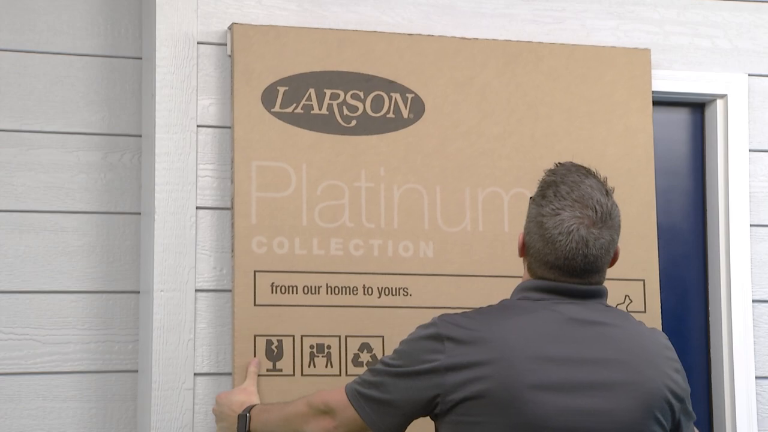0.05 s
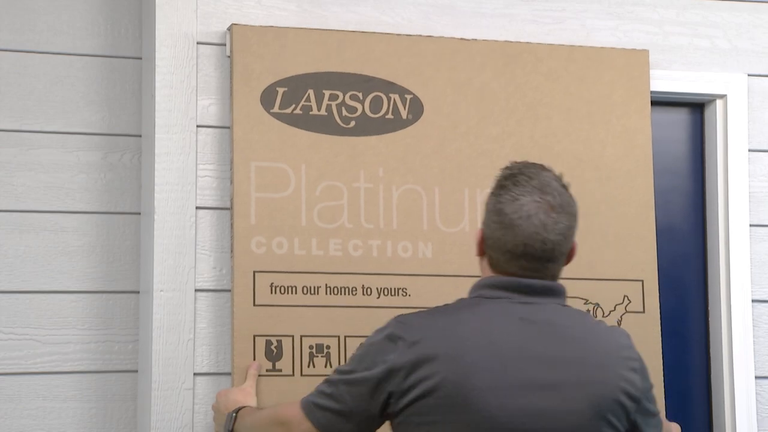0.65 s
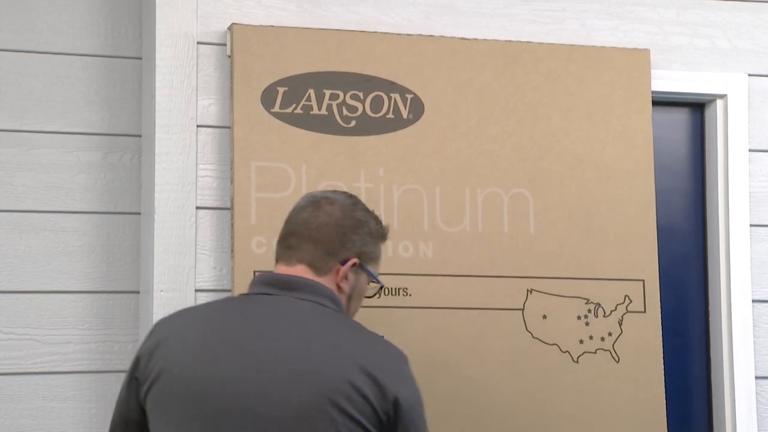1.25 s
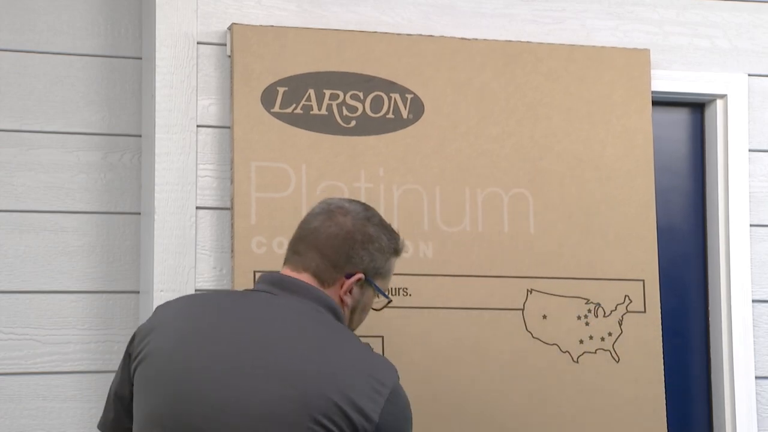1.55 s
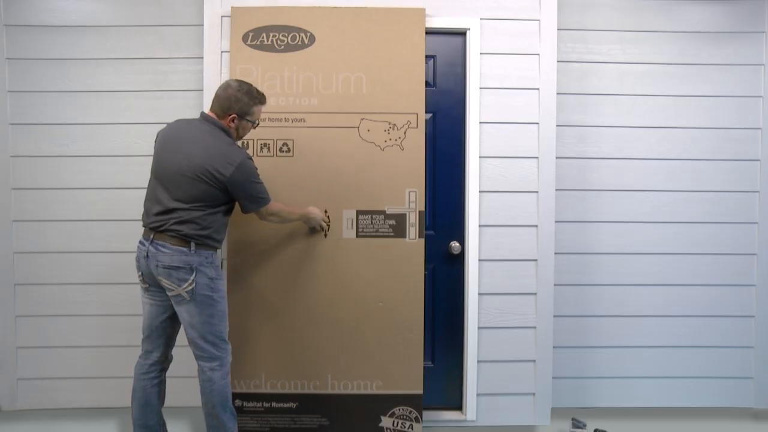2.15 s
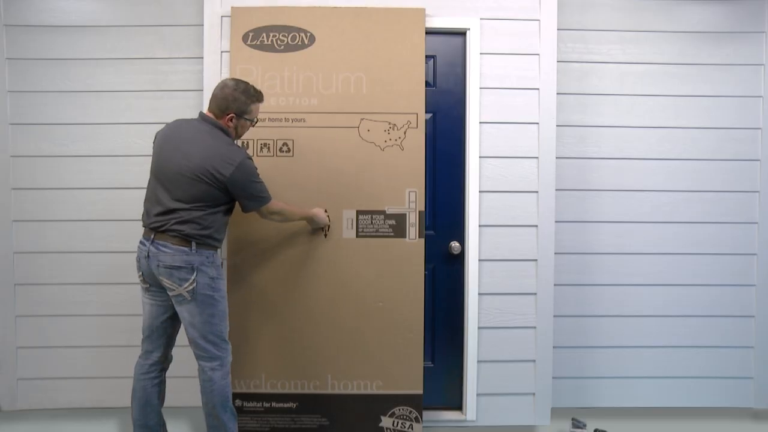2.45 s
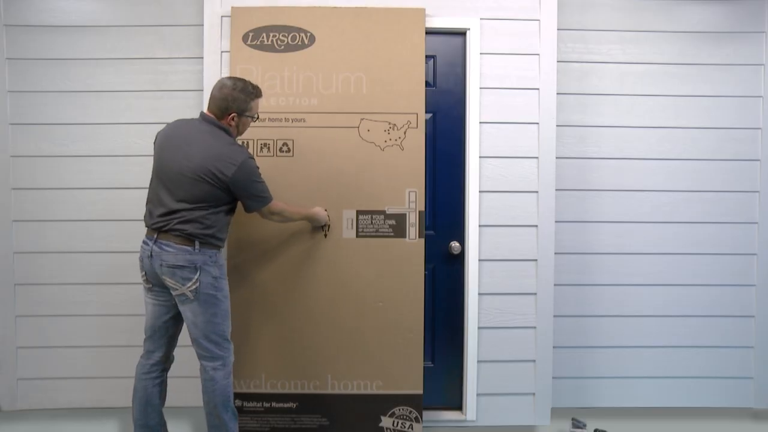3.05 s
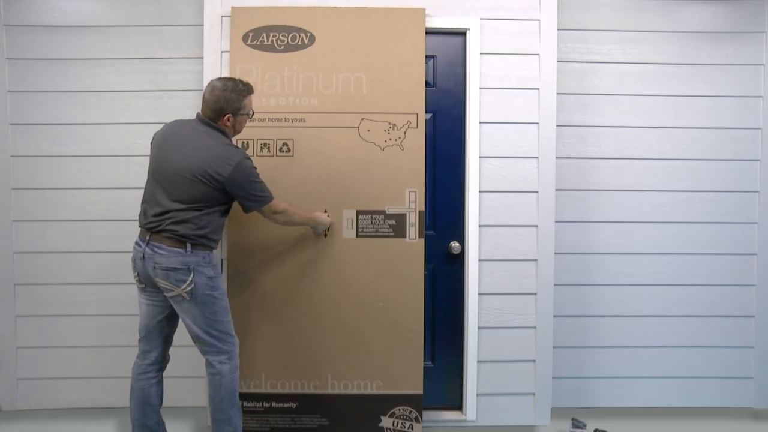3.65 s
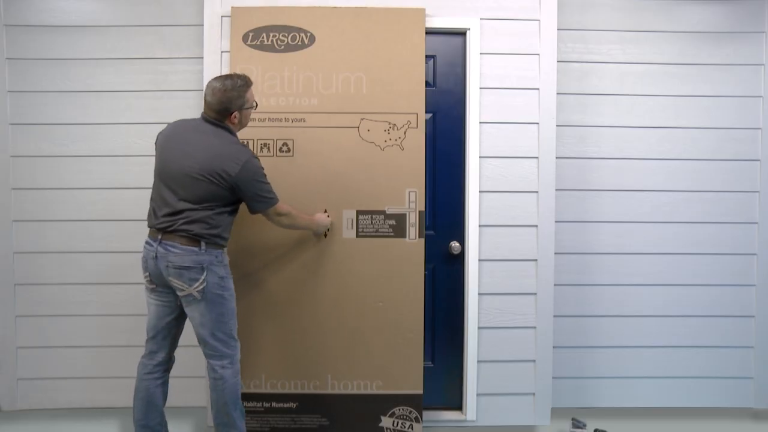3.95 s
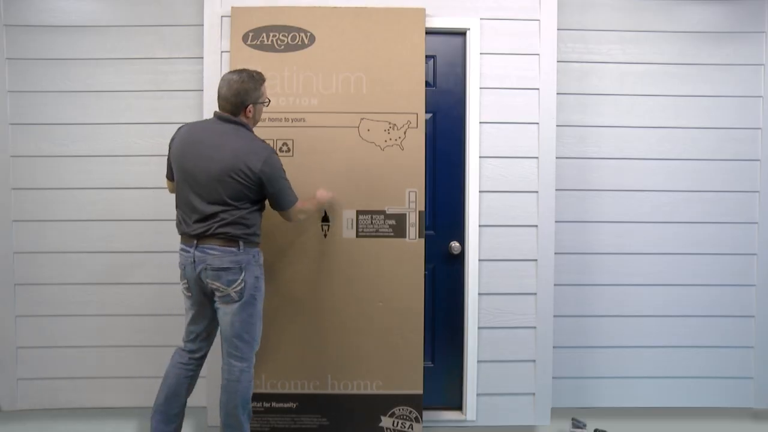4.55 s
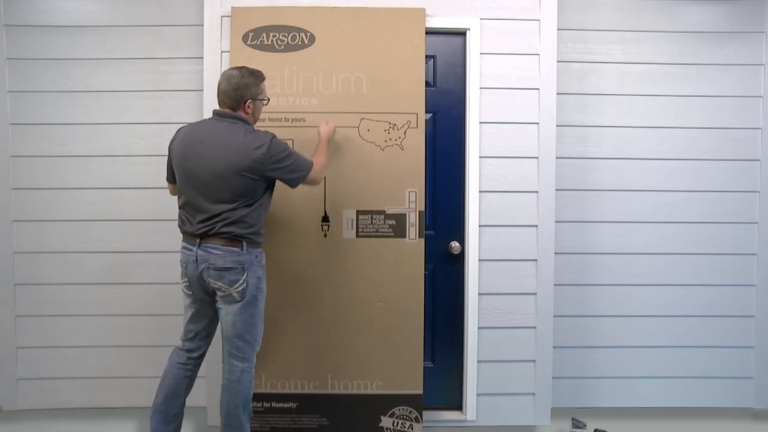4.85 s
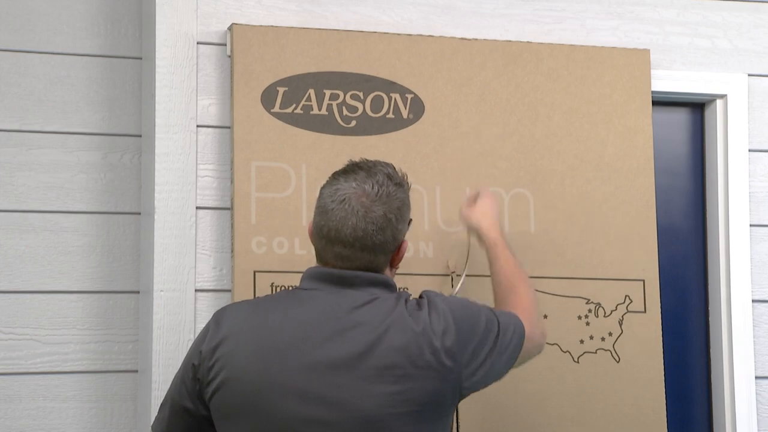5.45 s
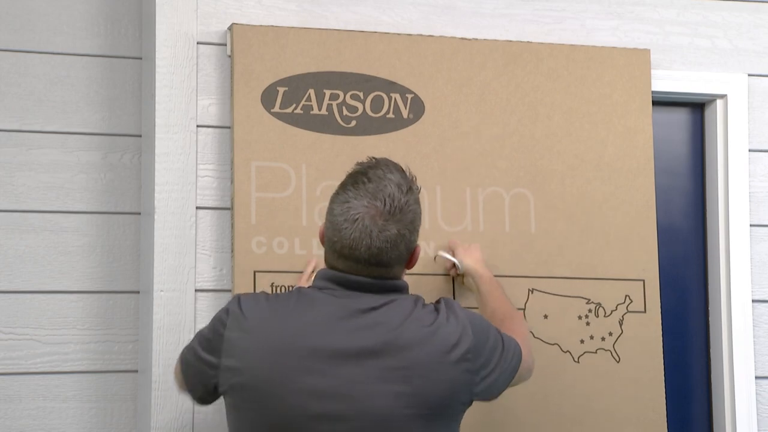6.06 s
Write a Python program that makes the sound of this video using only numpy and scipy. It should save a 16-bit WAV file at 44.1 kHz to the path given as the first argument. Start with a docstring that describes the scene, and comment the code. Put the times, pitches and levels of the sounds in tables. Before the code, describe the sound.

On a quiet porch, a large cardboard box is handled lightly while a brief gust bumps the microphone. A knife pokes through the cardboard in clusters of dry snaps, with small rubs and hollow knocks that echo briefly off the walls. One loud, short rip follows as the blade chops through the ridges, rasping and booming. Sleeves swish faintly, and a last sharp stab ends it.

```python
"""A knife rips up through a tall cardboard box, chopping across the flutes as the big panel booms.
Before the rip it is worked in with sharp snaps, dry pops and hollow knocks; the porch walls answer.
Sleeves rustle, a puff of wind bumps the microphone, and at the end the blade bites in again."""
import sys
import numpy as np
from scipy import signal
from scipy.fft import rfft, irfft, next_fast_len
from scipy.io import wavfile
from scipy.ndimage import map_coordinates

SR = 44100
rng = np.random.default_rng(int(sys.argv[2]) if len(sys.argv) > 2 else 0)


def transcribe(u):
    """Save the signal u as a 16-bit wav file named by the first command-line argument.

    u: samples, shape (n,) or (channels, n), limited to [-1, 1]; the rate is SR.
    q: integer samples, one column per channel.
    """
    v = np.clip(np.atleast_2d(u).T, -1, 1)
    q = np.round(v * 32767).astype(np.int16)
    wavfile.write(sys.argv[1], SR, q)


N = 277830
T = np.arange(N) / SR
CUT_START_S, CUT_FULL_S, CUT_END_S = 4.338, 4.415, 5.1606

# broad crack of cardboard: f/Hz, level/dB
CRACK_SPECTRUM = [(100, -14), (290, 2.5), (600, -0.5), (1200, 1), (2100, 0), (4000, -4), (7000, -7),
                  (12500, -4.5), (16000, -23)]
# rasp of the torn edge, lower as the slit opens: t/s, f/Hz, level/dB
EDGE_RASP = [(4.39, 9700, -7), (4.47, 6550, -1), (4.55, 5660, 1.5), (4.65, 4800, 1.5), (4.71, 4860, -9),
             (4.8, 5430, 5), (4.92, 4970, 1), (5.15, 4600, -7)]


def amp(db):
    """Decibels to gain."""
    return 10 ** (np.asarray(db) / 20)


def unit(x):
    """Scale to rms 1."""
    return x / np.sqrt(np.mean(x ** 2) + 1e-20)


def along(points, hz):
    """Read (f/Hz, value) points on a log axis."""
    f, v = np.transpose(points)
    return np.interp(np.log(hz + 1), np.log(f), v)


def course(rows):
    """Pitch and gain per sample from (t/s, f/Hz, level/dB) rows."""
    s, hz, db = np.transpose(rows)
    return np.interp(T, s, hz), amp(np.interp(T, s, db))


def gate(start_s, end_s, attack_s, release_s):
    """1 from start to end, with exponential flanks."""
    return np.exp(-np.maximum(0, np.maximum((start_s - T) / attack_s, (T - end_s) / release_s)))


def bell(t, sigma_s):
    """Gaussian, 1 at t = 0."""
    return np.exp(-(t / sigma_s) ** 2 / 2)


def wobble(rate_hz):
    """Smooth random curve through knots at rate_hz."""
    knots = rng.standard_normal(int(N * rate_hz / SR) + 4)
    return map_coordinates(knots, [T * rate_hz])


def grains(rate_hz, spread_db):
    """Tiny random clicks of unequal size, rms 1."""
    clicks = (rng.random(N) < rate_hz / SR) * rng.choice([-1, 1], N)
    return unit(clicks * amp(spread_db * np.clip(rng.standard_normal(N), -2, 2)))


def add(track, s, sound):
    """Mix a sound in at time s."""
    part = track[round(s * SR):][:len(sound)]
    part += sound[:len(part)]


def filtered(x, response):
    """Apply a frequency response."""
    size = next_fast_len(len(x) + SR // 10, real=True)
    return irfft(rfft(x, size) * response(np.fft.rfftfreq(size, 1 / SR)), size)[:len(x)]


def highpass(x, edge_hz, order):
    """Zero-phase bass cut, -6 dB at the edge."""
    return filtered(x, lambda hz: hz ** order / (hz ** order + edge_hz ** order))


def coloured(x, spectrum):
    """Shape by (f/Hz, level/dB) points, rms 1."""
    return unit(filtered(x, lambda hz: amp(along(spectrum, hz))))


def resonate(x, modes):
    """Resonances (f/Hz, width/Hz, level/dB) of alternating sign, rms 1."""
    def response(f):
        return sum((-1) ** k * amp(db) * 1j * f * width / (hz * hz - f * f + 1j * f * width)
                   for k, (hz, width, db) in enumerate(modes))
    return unit(filtered(x, response))


def glide(x, hz, width_hz):
    """One resonance of moving pitch, rms 1."""
    turn = np.exp(2j * np.pi * np.cumsum(hz) / SR)
    ring = signal.lfilter([1], [1, -np.exp(-np.pi * width_hz / SR)], x / turn)
    return unit((ring * turn).real)


def burst(hz, width_hz, t60_s, crack_db, rise_s=0.00018):
    """Damped resonance plus the broad crack of cardboard, peak near 1."""
    t = np.arange(SR // 10) / SR
    decay = np.exp(-np.log(1000) * t / max(t60_s, 0.002)) * (1 - np.exp(-t / rise_s))
    ring_noise, crack_noise = rng.standard_normal((2, len(t)))
    ring = resonate(ring_noise * decay, [(hz, width_hz, 0)])
    crack = amp(crack_db) * unit(decay * coloured(crack_noise, CRACK_SPECTRUM))
    return unit(ring + crack) * np.sqrt(np.mean(decay ** 2)) / decay.max() / 2


def porch(x, tail_db, early_db, early_t60_s):
    """Add dull early reflections off box and wall, and a tail whose treble dies first."""
    # porch decay: f/Hz, t60/s
    decay_times = [(150, 0.83), (400, 0.74), (1040, 0.75), (2760, 0.56), (7280, 0.43), (15000, 0.26)]
    hz, t, bands = signal.stft(rng.standard_normal(SR), SR, nperseg=256)
    bands = bands * np.exp(-np.log(1000) * t / along(decay_times, hz)[:, None])
    tail = signal.istft(bands, SR, nperseg=256)[1]
    age = np.arange(len(tail)) / SR
    early = rng.standard_normal(len(tail)) * np.exp(-np.log(1000) * age / early_t60_s) * (age > 0.002)
    early = filtered(early / np.linalg.norm(early), lambda hz: 1 / (1 + 1j * hz / 9000))
    answer = amp(tail_db) * tail / np.linalg.norm(tail) + amp(early_db) * early
    return x + signal.fftconvolve(x, answer)[:len(x)]


def background():
    """Quiet steady noise, mostly bass."""
    # ambience: f/Hz, level/dB
    spectrum = [(15, -27), (25, 3.5), (92, -7), (153, 1.5), (344, -8.5), (591, -8.5), (1000, -11),
                (3080, -17), (9070, -21), (15300, -25), (16000, -34)]
    return amp(-63.5) * coloured(rng.standard_normal(N), spectrum)


def wind():
    """One puff buffets the microphone; each eddy is a suck and a push on the diaphragm."""
    # buffeting: f/Hz, level/dB
    spectrum = [(12, -38), (20, -3), (43, 12.5), (81, -1.5), (145, -16), (352, -32), (500, -52), (650, -66),
                (1100, -120)]
    # single eddies: t/s, peak/dB, f/Hz
    eddies = [(0.499, -39, 63), (0.639, -41, 73), (0.768, -31.5, 119), (0.792, -29.5, 72.5),
              (0.837, -32, 111), (0.901, -18.5, 79), (1.013, -37.5, 86), (1.395, -39, 80),
              (1.779, -41.5, 58.7)]
    peak_s, rise_db_per_s, fall_db_per_s = 0.81, 25, 21
    swell_db = -36.5 - np.maximum(rise_db_per_s * (peak_s - T), fall_db_per_s * (T - peak_s))
    lull_db = -11 * bell(T - 1.236, sigma_s=0.033)
    gust = amp(swell_db + lull_db) * gate(0.41, 1.68, attack_s=0.015, release_s=0.12)
    out = gust * unit(amp(4.3 * wobble(23.04)) * coloured(rng.standard_normal(N), spectrum))
    for s, db, hz in eddies:
        phase = 2 * np.pi * hz * (T - s)
        out += amp(db) * phase * np.exp((1 - phase ** 2) / 2)
    return out


def sleeves():
    """Sleeves and knife cord on the liner: some strokes full brushes, others a thin high swish."""
    # strokes: peak t/s, level/dB, sigma/s, lower edge/Hz
    strokes = [(0.059, -53.5, 0.016, 815), (0.119, -61.5, 0.043, 885), (0.388, -58.5, 0.017, 600),
               (0.726, -57.5, 0.07, 2780), (0.899, -60.5, 0.025, 900), (5.39, -51.5, 0.022, 6740),
               (5.529, -53, 0.052, 4430), (5.921, -59.5, 0.13, 1512), (6.222, -45, 0.073, 2210)]
    # sliding threads: f/Hz, level/dB
    spectrum = [(200, 30), (900, 19), (2500, 9.5), (6000, 4.5), (12000, 5), (16000, -8.5)]
    out, t = np.zeros(N), np.arange(SR // 2) / SR - 1 / 4
    for s, db, sigma_s, edge_hz in strokes:
        threads = coloured(grains(rate_hz=12000, spread_db=7)[:len(t)], spectrum)
        stroke = unit(highpass(threads, edge_hz, order=2)) * bell(t, sigma_s)
        start_s = s + t[0]
        add(out, max(start_s, 0), amp(db) * stroke[max(0, round(-start_s * SR)):])
    return out


def pops():
    """Single flutes buckle under the hand: a faint click and a short, dull knock."""
    # buckling flutes: t/s, level/dB, f/Hz
    buckles = [(1.616, -46, 1040), (2.572, -36, 990), (2.808, -41, 755), (3.668, -46, 1030),
               (3.708, -40.5, 634), (3.767, -45.5, 1040), (3.823, -47, 1070), (4.132, -46, 610),
               (4.175, -48, 590), (5.7506, -40.5, 720)]
    out = np.zeros(N)
    for s, db, hz in buckles:
        spot = burst(hz, width_hz=0.14 * hz, t60_s=0.0092, crack_db=-6, rise_s=0.0015)
        box = amp(-1.5) * burst(990, width_hz=150, t60_s=0.022, crack_db=-9, rise_s=0.0017)
        add(out, s, amp(db - 4) * (spot + box))
    return porch(out, tail_db=-7, early_db=-9, early_t60_s=0.07)


def handling():
    """A short squeak and dull knocks on the box, some ringing all of it; knife and cord tick."""
    # a squeak, then knocks: t/s, level/dB, f/Hz, t60/s, box re spot/dB
    contacts = [(0.275, -38, 1200, 0.056, -32), (0.822, -37.5, 456, 0.16, -30), (1.334, -36, 560, 0.17, 1),
                (4.221, -34, 480, 0.049, -6)]
    # damping by the soft hand: f/Hz, level/dB
    soft_hand = [(1300, -1.5), (1800, -4.5)]
    # knife and cord ticks: t/s, level/dB, f/Hz
    taps = [(0.101, -39.5, 2820), (0.278, -41, 11800), (0.36, -39.5, 6500), (0.8253, -41, 2820),
            (2.8606, -40.5, 2900), (5.6378, -39.5, 8500), (6.038, -35, 11500), (6.047, -40, 11000)]
    board, ticks = np.zeros((2, N))
    for s, db, hz, t60_s, box_db in contacts:
        spot = burst(hz, width_hz=0.19 * hz, t60_s=t60_s, crack_db=-14, rise_s=0.003)
        box = amp(box_db) * burst(920, width_hz=210, t60_s=0.33 * t60_s, crack_db=-30)
        add(board, s, amp(db - 2.5) * (spot + box))
    board = filtered(board, lambda hz: amp(along(soft_hand, hz)))
    for s, db, hz in taps:
        add(ticks, s, amp(db - 6) * burst(hz, width_hz=0.46 * hz, t60_s=0.027, crack_db=-3.5))
    return porch(board + ticks, tail_db=-8.5, early_db=-7, early_t60_s=0.1)


def rubs():
    """The blade rubs in its slot and sets the board around it humming."""
    # blade strokes: t/s, level/dB, length/s
    strokes = [(2.31, -43, 0.0098), (2.448, -44.5, 0.0064), (2.561, -49, 0.019), (2.805, -54.5, 0.079),
               (3.035, -45, 0.015), (4.207, -43, 0.017), (4.314, -32, 0.0081), (6.112, -53, 0.014)]
    scrape = coloured(grains(rate_hz=5100, spread_db=-2), CRACK_SPECTRUM)
    hum = amp(-7) * resonate(grains(rate_hz=2500, spread_db=1), [(690, 200, -1), (1067, 78, -1)])
    contact = sum(amp(db) * gate(s, s + length_s, attack_s=0.0046, release_s=0.016)
                  for s, db, length_s in strokes)
    return amp(-5.5) * porch(contact * (scrape + hum), tail_db=-1, early_db=-15, early_t60_s=0.29)


def bites():
    """The blade bites in again: a thunk and a tear."""
    # blade entries: t/s, level/dB, t60/s
    entries = [(6.281, -30.5, 0.24), (6.2953, -10, 0.02)]
    out = np.zeros(N)
    for s, db, t60_s in entries:
        thunk = amp(-0.5) * burst(1020, width_hz=67, t60_s=t60_s, crack_db=-7)
        tear = burst(2660, width_hz=3300, t60_s=t60_s, crack_db=-8)
        add(out, s, amp(db) * (thunk + tear))
    return out


def blade_ping():
    """The steel blade springs free and rings briefly."""
    # blade modes: f/Hz, level/dB, t60/s
    modes = [(1880, 1, 0.023), (4120, -0.5, 0.022), (4420, -1, .021)]
    t = np.arange(SR // 10) / SR
    return sum(amp(db - 60 * t / t60_s) * np.sin(2 * np.pi * hz * t) for hz, db, t60_s in modes) / 2


def snaps():
    """The point punches the liner: it gives, the board thuds, the toughest fibres click."""
    # liner cracks: t/s, level/dB, f/Hz, click/dB, rise/s, ping/dB
    cracks = [(1.8352, -29.5, 6760, -22, 0.00073, -16), (1.882, -24, 1260, 6, 0.0021, -22),
              (1.8974, -21.5, 1280, 5.5, 0.00014, -30), (1.916, -30, 1400, 7, 0.0023, -27),
              (2.2714, -27, 3200, 1, 0.0012, 1), (2.316, -35.5, 1870, -13, .0005, -7),
              (2.4119, -38, 1910, -23, 0.00045, -11), (2.625, -35, 1320, -5, 0.00077, -26),
              (2.9813, -29.5, 2160, -21, 0.00026, -0.5), (2.9851, -29.5, 3500, 18.5, .0002, -21),
              (2.9876, -29, 1990, 16, 0.00029, -2), (2.9919, -24.5, 1910, 1, 0.00049, -2),
              (3.0482, -24.5, 2600, 10, 0.00019, -4), (4.2258, -26.5, 7300, 7, 0.0015, -30),
              (4.314, -27.5, 5200, 4, 0.0046, -24)]
    out = np.zeros(N)
    for s, db, hz, click_db, rise_s, ping_db in cracks:
        give = burst(hz, width_hz=hz / 2, t60_s=0.018, crack_db=-3, rise_s=rise_s)
        thud = amp(-13.5) * burst(580, width_hz=290, t60_s=0.028, crack_db=-27, rise_s=0.001)
        click = amp(click_db) * burst(10000, width_hz=4500, t60_s=0.0039, crack_db=-3, rise_s=0.0001)
        snap = np.pad(give + thud + click, (0, SR // 2))
        add(out, s, amp(db - 4.5) * porch(snap, tail_db=-3.5, early_db=-0.5, early_t60_s=0.19))
        add(out, s, amp(db + ping_db - 3) * blade_ping())  # close and dry
    return highpass(out, 170, order=3)  # so small a spot radiates no bass


def pull():
    """Gain of the arm's pull: builds, holds, stops as the blade runs out."""
    attack_db = 8.5 * np.maximum(0, (CUT_FULL_S - T) / (CUT_FULL_S - CUT_START_S)) ** 2
    release_db = 518 * np.maximum(0, T - CUT_END_S)
    return gate(CUT_START_S, np.inf, attack_s=0.0084, release_s=1) * amp(-attack_db - release_db)


def flute_force(rate_hz, unsteady, relax_flutes, uneven_db):
    """Force on the blade: jumps at each flute, relaxes until the next."""
    crossed = np.cumsum(rate_hz * np.exp(unsteady * wobble(45))) / SR
    strength = amp(uneven_db * rng.standard_normal(SR))[crossed.astype(int)]
    return unit(strength * (0.35 + np.exp(-(crossed % 1) / relax_flutes)))


def tearing(force):
    """Drive on the heavy board, which follows the jerks only loosely."""
    return np.sqrt(force) * grains(rate_hz=9000, spread_db=2.5)


def panel_boom(force):
    """The panel booms lower at its slack middle than near its stiff top."""
    # panel modes, middle and top: f/Hz, width/Hz, level/dB
    slack_modes = [(107, 23, -1), (198, 47, 0.5), (262, 38, 1.5), (303, 29, -1.5)]
    stiff_modes = [(214, 11, -24), (234.2, 15, 4.5), (263, 6.3, -3.5), (312, 36, -0.5)]
    # slack modes in the mix: t/s, power share
    slackness = [(4.5, 0.92), (4.75, 0.079)]
    share = np.interp(T, *np.transpose(slackness))
    stiff = unit(highpass(resonate(tearing(force), stiff_modes), 190, order=8))
    slack = resonate(tearing(force), slack_modes)
    sway = np.sqrt(share) * slack + np.sqrt(1 - share) * stiff
    return highpass(sway, 125, order=6)  # a light panel hardly radiates deep bass


def board_chop(force, treble_gain):
    """Chopping rings board, hollow and flaps; the flaps rise as less free board is left."""
    # flaps either side of the cut: t/s, f/Hz, level/dB
    near_flap = [(4.5, 730, -15), (4.6, 763, -0.5), (4.68, 710, 1.5), (4.74, 726, -14), (4.83, 820, -2),
                 (4.92, 930, -8.5), (4.97, 1090, -4), (5.03, 1400, -4), (5.13, 1000, -10)]
    far_flap = [(4.45, 1075, -8.5), (4.56, 1010, -10), (4.67, 980, -4.5), (4.73, 1040, -12),
                (4.79, 1080, -3.5), (4.83, 1410, -21), (4.89, 1580, -4.5), (5.05, 1900, -26),
                (5.12, 2460, -8.5)]
    # board: f/Hz, level/dB
    spectrum = [(190, -30), (350, -23), (411, -5.5), (624, -3), (1100, -6.5), (1250, -8), (2180, -9.5),
                (2600, -15.5), (4000, -19), (5200, -23), (8800, -120)]
    # hollow box: f/Hz, width/Hz, level/dB
    hollow_modes = [(410, 17.3, -3), (446, 47, -10), (1075, 42, -8), (1894, 150, -14.5), (2373, 170, -13),
                    (3420, 380, -15.5)]
    flaps = sum(gain * glide(tearing(force), hz * (1 + 0.04 * wobble(60)), width_hz=130)
                for hz, gain in map(course, (near_flap, far_flap)))
    board = amp(-1) * coloured(tearing(force), spectrum)
    hollow = amp(-5.5) * resonate(tearing(force), hollow_modes)
    body = highpass(board + flaps + hollow, 230, order=6)
    return body + (treble_gain - 1) * highpass(body, 1300, order=4)


def fibre_crackle(force):
    """Fibres break in clumps at each flute; the torn edge rasps."""
    # crackle: f/Hz, level/dB
    spectrum = [(1500, -31), (3000, 10.5), (4000, -4), (5200, 7.5), (6800, 7), (9000, -9), (16000, -39)]
    clumps, edge = [force ** 1.2 * grains(rate_hz=1700, spread_db=4) for _ in range(2)]
    rasp_hz, rasp_gain = course(EDGE_RASP)
    rasp = rasp_gain * glide(edge, rasp_hz, width_hz=740)
    return amp(-2.5) * coloured(clumps, spectrum) + amp(-1) * rasp


def blade_hiss(force):
    """The blade hisses in the slit, pulsing with the force."""
    # hiss: f/Hz, level/dB
    spectrum = [(4000, -4), (7500, 0), (10000, 1), (13000, -3), (16000, -12)]
    return coloured(force * grains(rate_hz=16000, spread_db=8), spectrum)


def fibre_breaks():
    """Tough fibres snap; lesser ones click at random near the pitch of the torn edge."""
    # tough fibres: t/s, level/dB, f/Hz
    tough = [(4.3425, -20, 8200), (4.3745, -16, 10100), (4.396, -14, 9740), (4.3965, -11.5, 2400),
             (4.442, -17, 3180), (4.4575, -6.5, 10100), (4.4866, -9, 6540), (4.4993, -10, 6600),
             (4.5125, -4, 5100), (4.5416, -4.5, 4850), (4.5519, -8.5, 4900), (4.5807, -9, 4530),
             (4.6266, -9.5, 4700), (4.645, -15, 4700), (4.7453, -12, 4900), (4.8006, -15, 5900),
             (4.8955, -12, 5230), (5.0206, -10.5, 5140)]
    out = np.zeros(N)
    for s, db, hz in tough:
        add(out, s, amp(db - 3.5) * burst(hz, width_hz=0.25 * hz, t60_s=0.011, crack_db=-7))
    rasp_s, rasp_hz, _ = np.transpose(EDGE_RASP)
    for place, size, detune in rng.random((44, 3)):
        s = CUT_FULL_S + place * (CUT_END_S - CUT_FULL_S)
        hz = np.interp(s, rasp_s, rasp_hz) * 2 ** (detune - 0.3)
        add(out, s, amp(-20 + 4 * size) * burst(hz, width_hz=0.5 * hz, t60_s=0.006, crack_db=-5))
    return out


def climbing(x, step_s=0.07):
    """Each crossfaded step of the cut up the box meets different reflections."""
    out = np.zeros(N)
    for s in np.arange(CUT_START_S - 2 * step_s, CUT_END_S + step_s, step_s):
        fade = np.maximum(0, 1 - np.abs((T - s) / step_s - 1))
        step = (x * fade)[round(s * SR):][:SR]
        add(out, s, porch(step, tail_db=-7.5, early_db=-7, early_t60_s=0.022))
    return out


def rip():
    """The long cut: one force across the flutes drives panel, board, fibres and blade."""
    # blade catches (+) and slips (-): t/s, level/dB, sigma/s
    catches = [(4.399, 6, 0.0034), (4.413, -3, 0.014), (4.452, 3.5, 0.014), (4.593, -3, 0.031),
               (4.718, -3, 0.0068), (4.808, 1, 0.042)]
    catch_db = sum(db * bell(T - s, sigma_s) for s, db, sigma_s in catches)
    climb_s = np.clip(T, CUT_START_S, CUT_END_S) - CUT_FULL_S
    # the short slit grips at first: more hiss, less board and crackle
    tight = np.interp(T - CUT_START_S, [0, 0.14], [1, 0])
    treble_gain = (0.73 + 0.26 * climb_s) * amp(0.58 * catch_db)  # the chop brightens as the cut climbs and when the blade catches
    effort = pull()
    force = flute_force(rate_hz=125, unsteady=0.35, relax_flutes=0.93, uneven_db=1)
    boom = amp(-37.5 + 1.7 * climb_s) * panel_boom(force)
    chop = amp(-27 + 3.2 * climb_s) * board_chop(force, treble_gain)
    crackle = amp(-32.3 - 5 * climb_s - 4 * tight + catch_db) * fibre_crackle(force)
    hiss = amp(-35.5 + 2.7 * climb_s + 10 * tight + 0.49 * catch_db) * blade_hiss(force)
    box = effort * amp(catch_db - 2.5 * tight) * (boom + chop)
    slit = effort * (crackle + hiss) + fibre_breaks()
    return climbing(box + highpass(slit, 250, order=4))  # fibres and blade radiate no bass


def scene():
    """Knife, box, sleeves and wind over the background, mono."""
    knife = rip() + snaps() + bites() + rubs()
    return (knife + handling() + pops() + sleeves() + wind() + background())[None]


def record(dry):
    """Microphone bass roll-off and band limit."""
    low_hz, top_hz = 45, 16000
    lean = filtered(dry[0], lambda hz: hz ** 2 / np.sqrt(hz ** 4 + low_hz ** 4))
    return filtered(lean, lambda hz: hz < top_hz)[None]


dry = scene()
out = record(dry)
transcribe(out)
```